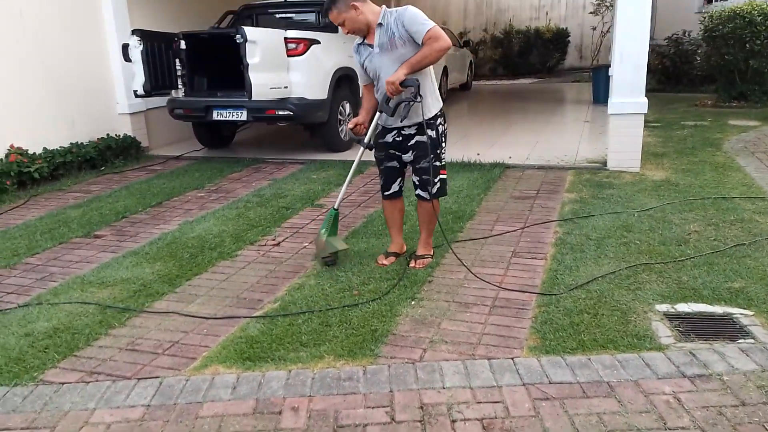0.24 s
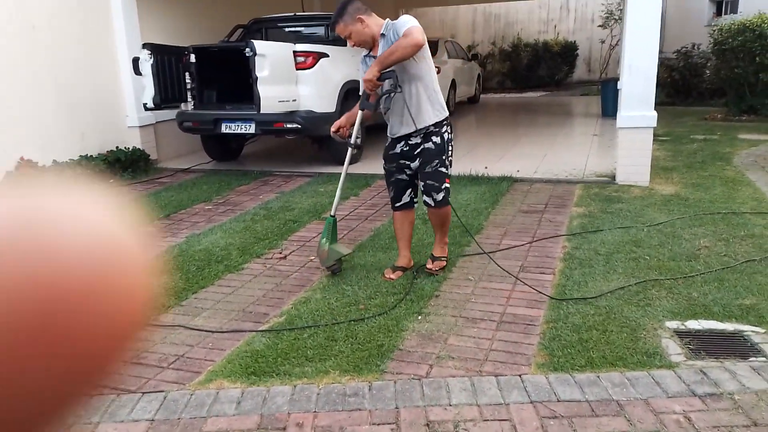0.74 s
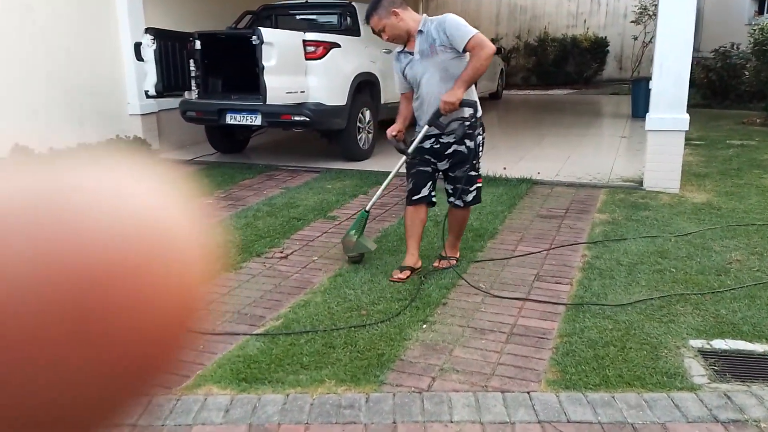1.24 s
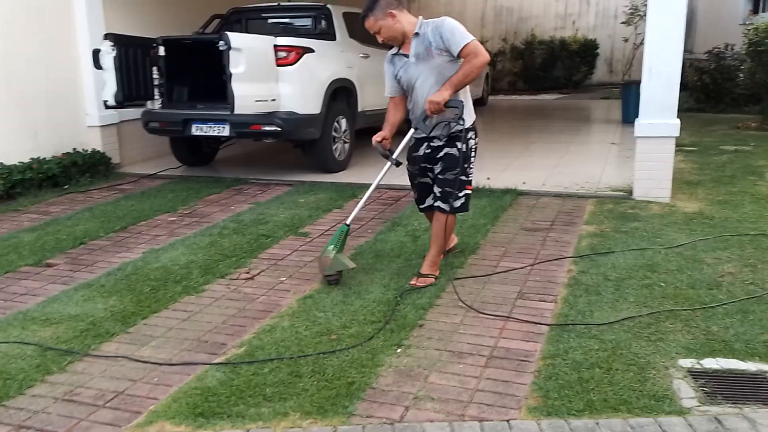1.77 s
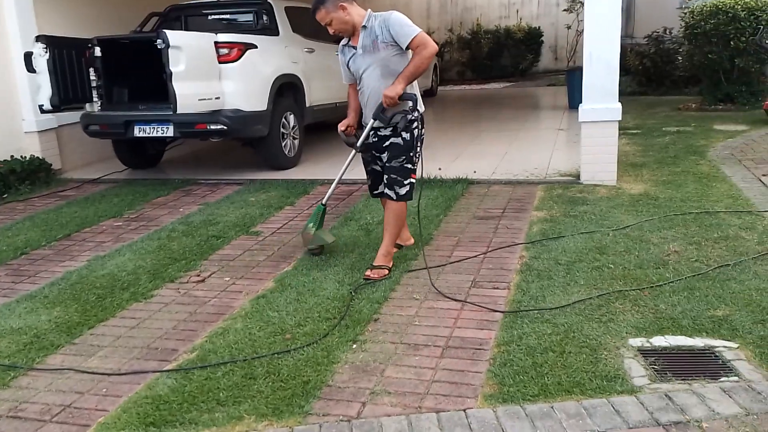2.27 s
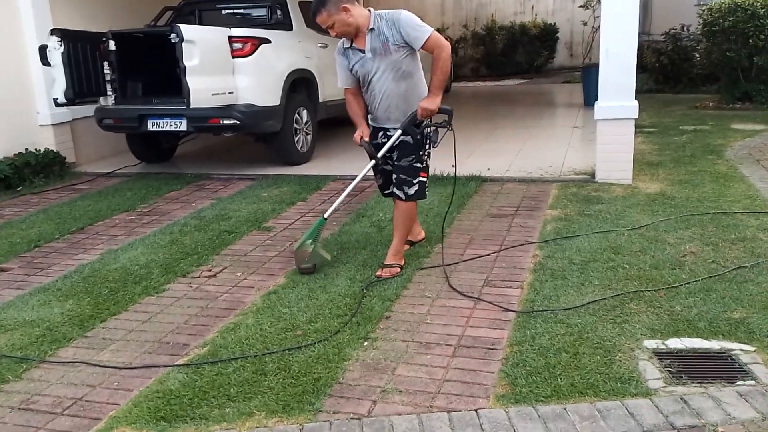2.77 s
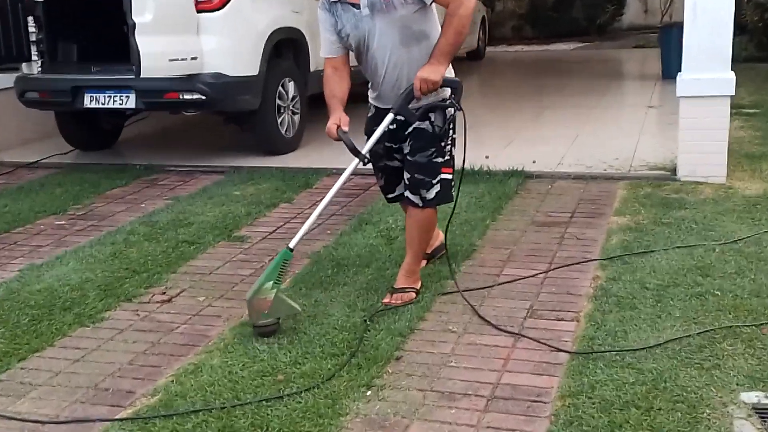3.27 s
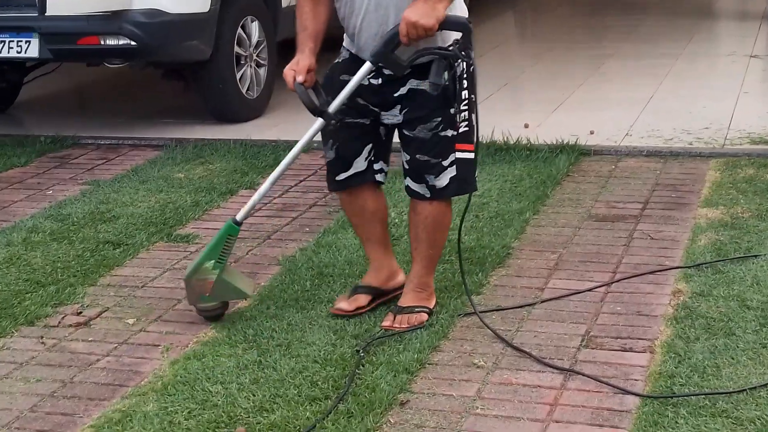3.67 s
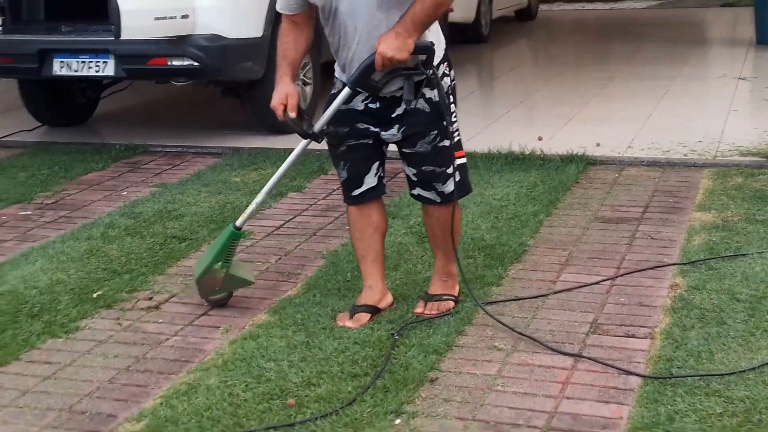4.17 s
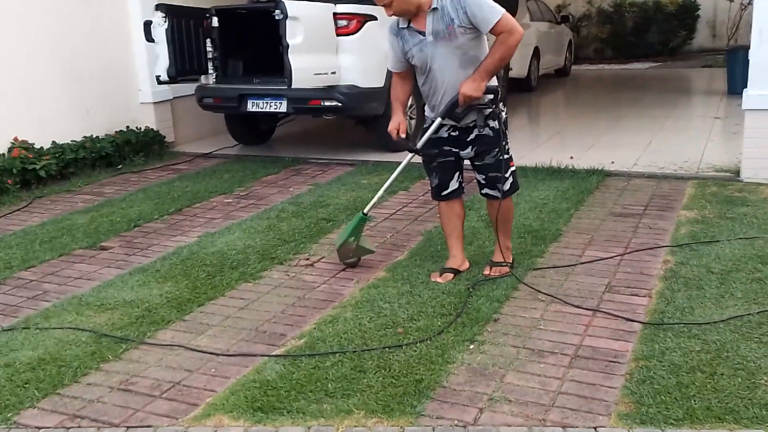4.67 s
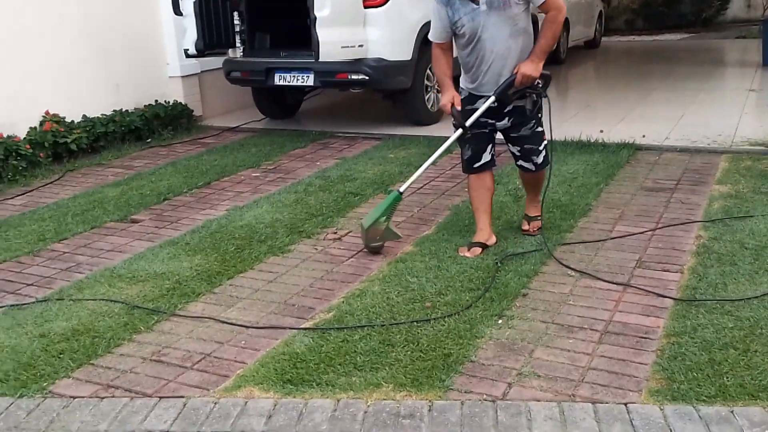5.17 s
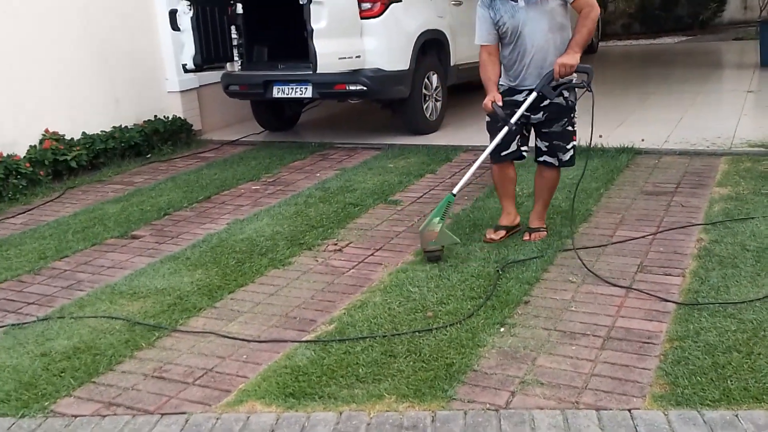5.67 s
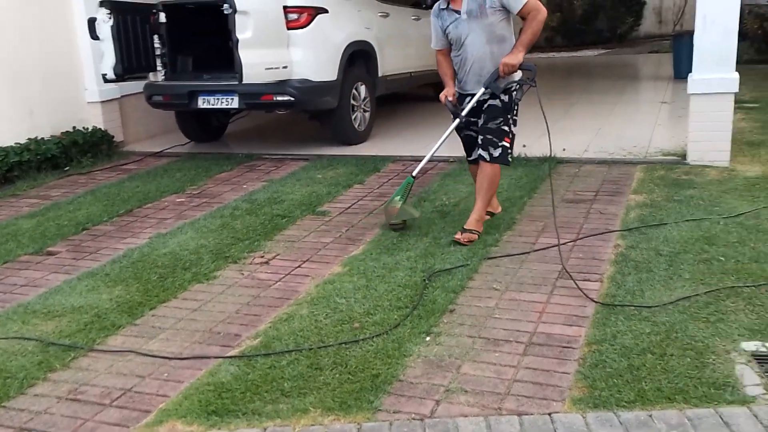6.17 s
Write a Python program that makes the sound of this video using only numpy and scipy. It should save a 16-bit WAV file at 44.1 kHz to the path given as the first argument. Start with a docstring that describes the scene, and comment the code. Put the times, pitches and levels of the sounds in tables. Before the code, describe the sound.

A corded electric string trimmer works close by on a driveway lawn strip. The trigger is pumped about twenty times in six seconds, so the buzzing hum and airy hiss rise and sag. Grass tears in raspy, fluttering bursts, with hard snaps clustered early, around two seconds and at the end. A handheld phone hears it in stereo, the left side first shaded by a hand, with short garage echo.

```python
"""A corded string trimmer works along a lawn strip in a driveway, heard through a hand-held phone.
The spinning nylon line hums as orders of the shaft speed, hisses and swishes as filtered noise, rasps in one
noise burst a turn through the grass, flaps in half orders, buffets its guard and snaps on stalks and pavers.
The trigger is pumped: the motor spins up and coasts down, faster in thick grass. A garage adds a short echo over
faint outdoor air. A hand shades the left microphone port and slides off; a finger briefly nears the right one."""
import sys
import numpy as np
from scipy import signal
from scipy.fft import rfft, irfft, next_fast_len
from scipy.io import wavfile
from scipy.ndimage import uniform_filter1d, minimum_filter1d

SR = 44100
rng = np.random.default_rng(int(sys.argv[2]) if len(sys.argv) > 2 else 0)


def wav_record(signal):
    """Record a signal, one row per channel, as 16-bit PCM in the file named by sys.argv[1]."""
    frames = np.transpose(np.atleast_2d(signal))
    bounded = np.clip(frames, -1, 1)
    # unit amplitude maps onto the largest positive 16-bit level
    quanta = np.round(bounded * 32767).astype(np.int16)
    wavfile.write(sys.argv[1], SR, quanta)


N = 282681
TIME = np.arange(N) / SR
USUAL_SPEED = 131.8  # turns per s; the reference for levels and pitches


def amp(db):
    """Decibels to gain."""
    return 10 ** (np.asarray(db) / 20)


def unit(x):
    """Scales to rms 1."""
    return x / np.sqrt(np.mean(x ** 2) + 1e-20)


def noise(channels=2):
    """White noise, independent in each channel."""
    return rng.standard_normal((channels, N))


def curve(rows):
    """A two-column table drawn as an automation line over time."""
    s, value = np.transpose(rows)
    return np.interp(TIME, s, value)


def read(points, hz):
    """Reads a spectrum at the given frequencies, on a logarithmic frequency scale."""
    f, value = np.transpose(points)
    return np.interp(np.log(hz + 1), np.log(f + 1), value)


def colour(x, points, size=4096):
    """Minimum-phase equaliser with the given spectrum."""
    log_gain = np.log(amp(read(points, abs(np.fft.fftfreq(size, 1 / SR)))))
    taps = np.fft.ifft(np.exp(np.conj(signal.hilbert(log_gain)))).real[:size // 2]
    return signal.oaconvolve(np.atleast_2d(x), taps[None], axes=1)[:, :N]


def wander(hz):
    """Slow random drift of rms 1, mostly below hz."""
    size = next_fast_len(N, True)
    lowpass = 1 / (1 + (np.fft.rfftfreq(size, 1 / SR) / hz) ** 4)
    return unit(irfft(rfft(rng.standard_normal(size)) * lowpass, size)[:N])


def sweep(turns, length):
    """Opens at the start of each turn and dies away over a share of it."""
    return np.exp(-(turns % 1) / length)


def passes(turns, depth_db, lag=0., sharp=4.9):
    """Gathers the sound into one burst a turn, at the same mean power."""
    gain = amp(depth_db * (.5 + .5 * np.cos(2 * np.pi * (turns - lag))) ** sharp)
    return gain / np.sqrt(uniform_filter1d(gain ** 2, size=1500))


def per_turn(turns, spread_db, size=2048):
    """A fresh random strength for every turn."""
    strengths = np.clip(rng.standard_normal(size), -2, 2)
    return amp(spread_db * strengths[turns.astype(int) % size])


def beats(turns):
    """One impulse a turn."""
    return np.diff(np.floor(turns), prepend=0)


# Pulls of the trigger: (pressed [s], released [s], speed reached [turns/s],
# then extra level of: second order [dB], third order [dB], hiss [dB], whir [dB])
TRIGGER_PULLS = [(0.0, 0.211, 119.3, -9, -6, 5.5, 16), (0.254, 0.379, 121.4, -2.5, -3, -9, 19.5),
                 (0.712, 1.03, 121, -2.5, -6, -0.5, 10.5), (1.201, 1.333, 114.4, -10, -7, -3.5, 6),
                 (1.5, 1.691, 122.5, -3, -6, 1, 11), (1.727, 1.977, 121, 0.5, -1, -4, 13.5),
                 (1.998, 2.062, 119, 4, 3, -13, 11), (2.122, 2.291, 116.6, -2.5, -1, 2.5, 8.5),
                 (2.434, 2.584, 132.5, 2.5, -1, 2.5, 5), (2.703, 2.859, 138, 2, 1, 3, 3),
                 (2.885, 2.998, 134.6, 0, 3, 2, 7.5), (3.202, 3.434, 138.3, 2.5, -7, 0.5, 3),
                 (3.599, 3.677, 129.7, -1, -6, 3.5, 10), (3.872, 4.025, 132, 3.5, -1, 4.5, 5),
                 (4.137, 4.277, 136, 3.5, -3, 5, 5.5), (4.426, 4.558, 133.3, 6.5, -1, 3.5, 8.5),
                 (4.732, 4.868, 135, 1, 0, 3.5, 10), (5.047, 5.171, 125.6, 3.5, -3, 4, 10),
                 (5.605, 5.919, 123.3, -4, -2, 1.5, 10), (5.995, 6.32, 134, -1.5, -7, -1.5, 1)]
# A tuft wraps the line and brakes the coasting shaft: (from [s], to [s], added slowing [turns/s per s])
SNAGS = [(0.384, 0.474, 123), (1.056, 1.195, 72), (5.25, 5.493, 15)]
START_SPEED, SPIN_UP_S = 72, .2  # turns per s; time constant of the motor
# slowing when coasting at the usual speed (turns/s per s): in air, and added in thick grass
AIR_DRAG, GRASS_DRAG = 132, 400
DRAG_POWER = 3.5  # the slowing grows with this power of the speed


def motor(tangle, size=2200):
    """Spins up while the trigger is held, then coasts against air, grass and snags; returns speed and torque 0-1."""
    speed, torque = np.full(N, float(START_SPEED)), np.zeros(N)
    drag = (AIR_DRAG + GRASS_DRAG * tangle) / USUAL_SPEED
    n = DRAG_POWER - 1
    brake = sum(slowing * (TIME > start) * (TIME < end) for start, end, slowing in SNAGS)
    for pressed, released, top, *_ in TRIGGER_PULLS:
        on, off = max(round(pressed * SR), 0), round(released * SR)
        rise = 1 - np.exp(-TIME[:off - on] / SPIN_UP_S)
        speed[on:off] = speed[on] + (top - speed[on]) * rise / rise[-1]
        torque[on:off] = 1 - rise
        # closed-form coasting under the power-law drag; the next pull overwrites the rest
        slowed = (USUAL_SPEED / top) ** n + n * np.cumsum(drag[off:]) / SR
        coasting = USUAL_SPEED * slowed ** (-1 / n)
        speed[off:] = np.maximum(coasting - np.cumsum(brake[off:]) / SR, USUAL_SPEED / 2)
    return uniform_filter1d(speed, size=size), uniform_filter1d(torque, size=size)


def aim(size=4000):
    """The head points differently on each pull: extra dB of second order, third order, hiss and whir."""
    pressed, _, _, *extras = np.transpose(TRIGGER_PULLS)
    pull = np.maximum(np.searchsorted(pressed, TIME) - 1, 0)
    return uniform_filter1d(np.array(extras)[:, pull], size=size, axis=1)


# The line strains against the grass and one order swells:
# (centre [s], half length [s], order [multiple of shaft speed], level [dB])
SWELLS = [(0.27, 0.061, 2.5, 9), (0.34, 0.05, 2, 12), (0.357, 0.024, 3, 11), (0.36, .025, 5, 18),
          (0.406, .03, 7, 14), (0.43, 0.022, 3, 7), (0.51, .03, 5, 17), (1.007, 0.032, 2.5, 8),
          (1.015, .045, 2, 16), (1.06, 0.029, 3, 18), (1.063, 0.025, 7, 19), (1.063, .03, 8, 24),
          (1.106, 0.031, 4, 26), (1.139, 0.035, 3, 21.5), (1.724, 0.048, 2.5, 18), (1.931, 0.065, 2, 9.5),
          (1.99, .05, 2.5, 6), (2.029, 0.046, 3, 5), (2.112, 0.049, 7, 13), (2.127, .05, 2, 14.5),
          (2.138, 0.056, 9, 16), (2.15, 0.064, 4, 12.5), (2.655, 0.048, 6, 11.5), (2.88, .04, 5, 15),
          (2.885, 0.038, 2, 11), (2.88, .03, 7, 17), (2.977, 0.031, 6, 0), (3.001, .04, 2, 15.5),
          (3.02, 0.038, 7, 8), (3.342, 0.049, 5, 13), (3.35, 0.051, 6, 4), (4.226, 0.036, 6, 1),
          (4.561, .05, 6, 4), (5.831, 0.049, 3, -3.5), (5.974, 0.043, 2, 9.5), (6.011, 0.032, 2.5, 14.5),
          (6.17, 0.06, 2.5, 13.5), (6.379, 0.042, 2.5, 16), (6.386, 0.028, 3, 9)]


def swell(order):
    """Extra dB of one order while the line strains, as bell-shaped rises."""
    extra_db = np.zeros(N)
    for s, half, swelling, db in SWELLS:
        if round(2 * swelling) == 2 * order:
            extra_db += db * np.exp(-.5 * ((TIME - s) / half) ** 2)
    return extra_db


# Higher orders of the hum: (frequency [Hz], level against the third order [dB])
HUM_SPECTRUM = [(330, 2), (440, -5.5), (500, -16), (620, -17.5), (800, -10.5), (1100, -16.5), (1600, -19)]
SHAFT_DB, SHAFT_WAVER_DB = -63.0, 3.3  # first order
HUM_SHUDDER, HUM_SHUDDER_HZ = .2, 22  # share by which each order shudders; rate in Hz per order
HUM_BLUR_TURNS = .085  # phase wobble of each order from the fifth up


def hum(turns, speed, second_db, third_db, follows=0.39, waver_db=2, wobble=0.0081, count=10):
    """The spinning line pushes air round: shuddering orders of the shaft speed, the high ones blurred."""
    angle = turns + wobble * wander(21)
    first_db = SHAFT_DB + follows * (second_db - np.median(second_db)) + SHAFT_WAVER_DB * wander(34)
    levels_db = [first_db, second_db, third_db]
    levels_db += [third_db + read(HUM_SPECTRUM, k * speed) + waver_db * wander(3.4) for k in range(4, count)]
    tone = 0
    for k, db in enumerate(levels_db, 1):
        blur = HUM_BLUR_TURNS * wander(35) if k >= 5 else 0
        shudder = 1 + HUM_SHUDDER * wander(HUM_SHUDDER_HZ * k) if k >= 2 else 1
        phase = k * angle + blur + rng.random()
        tone = tone + amp(db + swell(k)) * shudder * np.cos(2 * np.pi * phase)
    return np.sqrt(2) * tone


# Hiss of the line at the usual speed: (frequency [Hz], level [dB])
HISS_SPECTRUM = [(500, -21.5), (2000, -12.5), (3500, -22.5), (5000, -13), (6500, -2), (8000, 2.5),
                 (10500, 2), (13000, -3), (17000, -4), (24000, 0)]
# Fixed colour of the hiss, thinner below 1 kHz and round 1.5 kHz: (frequency [Hz], gain [dB])
HISS_LOW_COLOUR = [(900, -10), (1200, 1.5), (1500, -5), (2100, -1)]


def hiss(turns, speed, bite, level_db, depth_db=14.0, patch_db=2.04, size=512):
    """Vortices shed by the line: pitch scales with speed, and they flare where the tip meets the grass."""
    hz, t, z = signal.stft(noise(), SR, nperseg=size)
    pitch = np.interp(t, TIME, speed) / USUAL_SPEED
    patches = uniform_filter1d(rng.standard_normal(z.shape[1:]), size=12, axis=0)
    patches = unit(uniform_filter1d(patches, size=5, axis=1))
    z = z * amp(read(HISS_SPECTRUM, hz[:, None] / pitch) + patch_db * patches)
    flare = passes(turns, depth_db * bite * amp(wander(5.1)))
    flare = flare * per_turn(turns + .5, spread_db=1.0 * np.sqrt(bite))
    shed = amp(level_db) * unit(flare) * signal.istft(z, nperseg=size)[1][:, :N]
    return colour(shed, HISS_LOW_COLOUR)


# centre at the usual speed and its lower limit; the centre rises with this power of the speed
SWISH_HZ, SWISH_LOWEST_HZ, SWISH_POWER = 9400, 4870, 1.3


def swish(speed, level_db, below=0.38, above=0.095, size=512):
    """The tip whistles in the air: a breathy band, steeper above than below (octaves), gliding with speed."""
    hz, t, z = signal.stft(noise(), SR, nperseg=size)
    pitch = np.interp(t, TIME, speed) / USUAL_SPEED
    centre = np.maximum(SWISH_HZ * pitch ** SWISH_POWER, SWISH_LOWEST_HZ)
    octaves = np.log2((hz[:, None] + 1) / centre)
    band = np.exp(-.5 * (octaves / np.where(octaves < 0, below, above)) ** 2)
    return amp(level_db) * signal.istft(z * band, nperseg=size)[1][:, :N]


# Dips of the head into the grass: (in [s], out [s], fade-in [s], rasp [dB], one-sided bite [0-1],
# flapping of the line [dB], extra buffeting of the guard [dB])
GRASS_CUTS = [(0.16, 0.203, 0.0059, -34, 0.2, -49.5, -1.5), (0.21, 0.291, 0.0062, -27, 0.53, -44, 6),
              (0.308, 0.419, 0.02, -24, 0.4, -46, 0.5), (0.416, 0.51, 0.014, -29, 0.32, -50, 9),
              (0.507, 0.558, .012, -37.5, 0.59, -54, 8), (0.571, 0.622, .012, -42.5, 0.1, -60, -1),
              (0.732, 0.933, 0.017, -39.5, 0.46, -57, 4), (0.919, 1.096, 0.019, -27, 0.65, -41, 8),
              (1.098, 1.195, 0.02, -33, 0.53, -46, 18), (1.183, 1.266, .012, -39, 0.74, -52.5, 3),
              (1.593, 1.732, 0.0084, -26, 0.57, -48, 6), (1.769, 2.022, 0.0094, -25.5, 0.37, -41.5, 2),
              (2.019, 2.318, .012, -24.5, 0.52, -50.5, 2.5), (2.323, 2.411, .012, -32, 0.46, -52, 6),
              (2.822, 2.897, 0.022, -37, 0.86, -58, 5.5), (2.908, 3.062, 0.012, -32.5, 0.65, -58, 5),
              (3.3, 3.57, 0.014, -31, 0.42, -61.5, -1.5), (3.628, 3.782, 0.014, -33, 0.24, -63.5, -0.5),
              (3.838, 4.212, 0.017, -31, 0.57, -64, -2.5), (4.224, 4.323, 0.015, -27.5, 0.98, -63, 1.5),
              (4.338, 4.532, 0.011, -31, 1, -63.5, -4), (4.536, 4.619, 0.015, -24.5, 0.95, -57, -12),
              (4.663, 5.07, 0.032, -32, 0.99, -62, -4.5), (5.069, 5.221, 0.011, -28, 0.99, -56, 1.5),
              (5.712, 5.973, 0.021, -43, 0.3, -55, 0), (5.968, 6.148, 0.02, -28, 0.37, -46.5, 0.5),
              (6.155, 6.454, 0.016, -25.5, 0.3, -50.5, -1)]
LIFT_OUT_S = .016  # how softly a cut ends
FREE_BITE, FREE_FLAP_DB = 0.23, -71  # one-sidedness and flapping of the line in open air


def grass():
    """Fades each cut in and out; returns contact, rasp and flapping gains, bite and extra buffeting (dB)."""
    start, end, fade, rasp_db, one_sided, flap_db, guard_db = np.transpose(GRASS_CUTS)
    dip_in = (1 + np.tanh(.5 * (TIME[:, None] - start) / fade)) / 2
    lift_out = (1 + np.tanh(.5 * (end - TIME[:, None]) / LIFT_OUT_S)) / 2
    touch = dip_in * lift_out
    bite = np.clip(FREE_BITE + touch @ (one_sided - FREE_BITE), 0, 1)
    flapping = amp(FREE_FLAP_DB) + touch @ amp(flap_db)
    return touch.sum(1), touch @ amp(rasp_db), flapping, bite, touch @ guard_db


# Tearing grass: (frequency [Hz], level [dB])
RASP_SPECTRUM = [(40, -67), (150, -46.5), (250, -7), (600, -6), (1450, -4), (2000, -2.5), (3000, -1.5),
                 (5000, -4), (8000, 0.5), (11000, 3.5), (15000, -1)]
SLAP_SHARE = .42


def rasp(turns, bite, level_db, blades_per_s=4000, size_db=0.0, depth_db=15, fray=1.0):
    """Blades of grass tear in a burst once a turn; for a few turns at a time the tip slaps the ground."""
    sizes = amp(size_db * np.sqrt(bite) * np.minimum(rng.exponential(1, N), 4))
    blades = (rng.random(N) < blades_per_s / SR) * sizes * rng.choice([-1, 1], N)
    burst = passes(turns, depth_db * bite, lag=0.21) * per_turn(turns + .5, spread_db=2 * np.sqrt(bite))
    tearing = unit((unit(blades) + fray * noise()) * burst)
    slap_runs = amp(4.6 * np.clip(wander(5.6), -2, 1.5))
    slaps = unit(beats(turns) * np.sqrt(bite) * per_turn(turns, spread_db=1) * slap_runs)
    return amp(level_db) * colour(unit(tearing + SLAP_SHARE * slaps), RASP_SPECTRUM)


# Flapping line: (frequency [Hz], level [dB])
FLAP_SPECTRUM = [(30, -56), (100, -32), (180, -39), (230, -6.5), (300, -2), (380, -1.5), (480, -26),
                 (620, -15), (1000, -27), (2500, -33)]


def flap(turns, level_db, rough_db=-3.0, upper_db=1.0):
    """The line whips on every second turn, strongest in grass: half orders over a rough flutter."""
    halves = 0
    for k in range(2, 5):
        gain = amp(upper_db * (k - 4.5) + swell(k + .5))
        halves = halves + gain * np.cos(2 * np.pi * ((k + .5) * turns + rng.random()))
    flutter = unit(colour(noise(1) * sweep(turns, length=0.91), FLAP_SPECTRUM))
    return amp(level_db) * (colour(halves, FLAP_SPECTRUM) + amp(rough_db) * flutter)


# Resonances of the plastic guard: (frequency [Hz], level [dB])
GUARD_SPECTRUM = [(30, -64), (150, -37.5), (300, 2.5), (450, 3), (580, -5.5), (720, 3.5), (830, 6.5),
                  (1000, 1), (1250, -14), (1500, -9.5), (2000, -5.5), (3500, -13), (9000, -19)]


def buffet(turns, level_db, thump=0.58, apart=0.44, wobble=0.023):
    """Each pass of the line sends a thump and a puff of air into the plastic guard."""
    angle = np.maximum.accumulate(turns + wobble * wander(60))
    puffs = unit((noise(1) + apart * noise()) * sweep(angle, length=1.0))
    thumps = unit(beats(angle) * per_turn(angle, spread_db=4.5))
    return amp(level_db) * unit(colour(puffs + thump * thumps, GUARD_SPECTRUM))


# The line strikes a stalk or a paver: (time [s], relative level [dB], brightness [dB of treble])
SNAPS = [(0.2407, -10, 7), (0.256, -5.5, -3), (0.26, -6.5, -9), (0.2705, -13, -7), (0.291, -13, -2),
         (0.3065, -11, 2), (0.314, -5.5, -23), (0.325, -11, 3), (0.368, -3, -10), (0.3851, -6, 3),
         (0.959, -8, 1), (1.007, -11, -13), (1.033, -11, -11), (1.042, -14, -6), (1.0498, -9, -11),
         (1.058, -10, -13), (1.4271, -19, -13), (1.602, -27, 14), (1.619, -20, 4), (1.705, -19, -3),
         (1.7121, -1.5, -6), (1.725, -15, 1), (1.7286, -2.5, -5), (1.7636, -9, -5), (1.7934, -15, 5),
         (1.86, -6, -5), (1.865, -12, -2), (1.886, -7, 0), (1.943, -9, 0), (1.96, -13, 0), (1.964, -9, -2),
         (1.976, -4.5, -6), (1.9814, -1, -10), (1.993, -16, 4), (2.0707, -15, -2), (2.1117, -17, 9),
         (2.1305, -12.5, 1), (2.1755, -12, 6), (2.278, -16, 7), (2.293, -15, 10), (2.3635, -19, 2),
         (2.6634, -23.5, 12), (2.7148, -29, 12), (2.8647, -4, -40), (2.872, -7, -33), (2.9179, -24, 11),
         (2.962, -6.5, -29), (3.899, -15.5, 2), (4.0745, -15.5, 6), (4.264, -9.5, -27), (4.453, -29, 12),
         (4.4855, -12, 2), (4.5625, -8, -17), (4.577, -11, -20), (4.689, -16, 5), (4.7598, -30, 16),
         (4.862, -18, 8), (4.9295, -9, -8), (4.979, -18, 2), (5.0376, -17, -2), (5.0961, -14, 4),
         (5.158, -0.5, -14.5), (6.1081, -13, -4), (6.117, -9, -10), (6.14, -18, 5), (6.155, -13, -9),
         (6.171, -15, 3), (6.1849, -13, -5), (6.2154, -3, -6), (6.2529, -4, 3), (6.364, -23, 9.5),
         (6.374, -4, -15)]
# Body of a crack: (frequency [Hz], level [dB])
CRACK_SPECTRUM = [(40, -67), (150, -35), (300, 4.5), (1000, -3), (3000, 3), (14000, 12)]


def snaps(level_db=-6.5, decay=0.001, lead=.0004, split_hz=6500, size=512):
    """Sharp cracks of the line on something hard: decaying noise ticks, each with its own treble."""
    out, t = np.zeros((2, N + size)), np.arange(size) / SR
    high = 1 / (1 + (split_hz / (np.fft.rfftfreq(size, 1 / SR) + 1)) ** 4)
    before = size // 8  # room for the ringing ahead of the strike
    for s, db, bright_db in SNAPS:
        crack = rng.choice([-1, 1], (2, size)) * np.exp(-t / decay)
        crack = irfft(rfft(np.roll(crack, before, 1)) * amp(bright_db * high))
        start = max(round((s - lead) * SR) - before, 0)
        out[:, start:start + size] += amp(db + level_db) * crack
    return colour(out[:, :N], CRACK_SPECTRUM)


# Fan and brushes of the motor: (frequency [Hz], level [dB])
WHIR_SPECTRUM = [(100, -36), (600, -15.5), (1150, -44), (1500, -46), (1950, -13), (2700, 2.5), (3500, -2),
                 (6000, -1.5), (8000, -19), (14000, -13)]


def whir(level_db):
    """Smooth rush of the motor's fan and brushes, as coloured noise."""
    return amp(level_db) * colour(noise(), WHIR_SPECTRUM)


# How long the garage rings: (frequency [Hz], time to fall 60 dB [s])
ECHO_DECAY = [(200, 0.84), (1000, 0.7), (4000, 0.13), (14000, 0.26)]


def garage(x, wet_db=-10, delay=0.013, size=16, count=4):
    """Scattered echoes from walls and cars; their pattern shifts as the trimmer moves."""
    out = x
    half_second = SR // 2
    for k in range(count):
        scattered = rng.random((2, half_second)) < 1 / size
        taps = rng.standard_normal((2, half_second)) * scattered * (TIME[:half_second] > delay)
        hz, t, z = signal.stft(taps, SR, nperseg=256)
        tail = signal.istft(z * amp(-60 * t / read(ECHO_DECAY, hz)[:, None]), nperseg=256)[1]
        tail = tail / np.linalg.norm(tail[0])
        share = np.sqrt(2 / count) * np.cos(np.pi * (TIME * (k + 1) + rng.random()))
        out = out + amp(wet_db) * signal.oaconvolve(x * share, tail, axes=1)[:, :N]
    return out


# Outdoor background: (frequency [Hz], level [dB])
AIR_SPECTRUM = [(25, -62), (70, -57), (150, -59), (400, -33), (850, -81), (1500, -58), (2500, -53),
                (10000, -89)]


def outdoor_air():
    """Steady outdoor bed: coloured noise, partly shared between the two sides."""
    return colour(noise(1) + 0.62 * noise(), AIR_SPECTRUM)


# How each sound grows, by name: (level at the usual speed [dB], growth [dB per doubling of speed],
# then added: on touching grass [dB], in thick grass [dB], at full torque [dB])
GROWTH = {"second": (-48, 35, 2.5, 0, 1), "third": (-43.5, 29, 1.5, 4, 0),
          "guard": (-43, 21.5, 1.5, 0.5, 3), "hiss": (-26.5, 26.5, -0.4, 2, -0.5),
          "whir": (-42.5, 22.5, -4.5, 8, 0), "swish": (-36, 10.5, 1.5, 2.5, 4.5)}
RASP_DB_PER_DOUBLING, FLAP_DB_PER_DOUBLING = -5.5, -7.5
HUM_WAVER_DB, HUM_WAVER_HZ = 2.5, 9.2
# rasp at which the grass counts as thick; flapping at which it holds the line back
THICK_DB, TANGLED_DB = -31.5, -45


def scene():
    """One shaft drives every sound of the trimmer: its speed and the grass set pitches and levels."""
    contact, rasping, flapping, bite, buffet_db = grass()
    load = np.tanh(rasping / amp(THICK_DB))
    speed, torque = motor(np.tanh((flapping / amp(TANGLED_DB)) ** 2))
    doublings = np.log2(speed / USUAL_SPEED)
    db = {name: base + slope * doublings + touching * contact + thick * load + pulling * torque
          for name, (base, slope, touching, thick, pulling) in GROWTH.items()}
    second_db, third_db, hiss_db, whir_db = aim()
    second_db = second_db + db["second"] + HUM_WAVER_DB * wander(HUM_WAVER_HZ)
    third_db = third_db + db["third"] + HUM_WAVER_DB * wander(HUM_WAVER_HZ)
    turns = np.cumsum(speed * (1 + .002 * wander(30))) / SR

    low = hum(turns, speed, second_db, third_db)
    low = low + flapping * flap(turns, FLAP_DB_PER_DOUBLING * doublings)
    low = low + buffet(turns, db["guard"] + buffet_db)
    high = hiss(turns, speed, bite, db["hiss"] + hiss_db) + swish(speed, db["swish"])
    high = high + rasping * rasp(turns, bite, RASP_DB_PER_DOUBLING * doublings)
    high = high + snaps() + whir(db["whir"] + whir_db)
    return low + garage(high) + outdoor_air()


def suppressor(x, floor_db=-85, slope=0.7, depth_db=10, from_hz=1100, size=512):
    """Noise reduction: above the bass, bands under a floor are turned down further, hollowing the lulls."""
    hz, t, z = signal.stft(x, SR, nperseg=size, scaling="psd")
    power = uniform_filter1d(uniform_filter1d(2 * abs(z) ** 2, size=5, axis=1), size=7, axis=2)
    under_db = floor_db - 10 * np.log10(abs(power) + 1e-20)
    cut_db = np.clip(slope * under_db, 0, depth_db) * (hz > from_hz)[:, None]
    return signal.istft(z * amp(-cut_db), SR, nperseg=size, scaling="psd")[1][:, :N]


def limiter(x, size=45):
    """Turns the gain down for a moment round the highest peaks."""
    gain = np.minimum(1, .85 / (abs(x) + 1e-9))
    return x * uniform_filter1d(minimum_filter1d(gain, size, axis=1), size, axis=1)


# Hand at the left port: (time [s], distance [0 close over it, .5 loosely cupped, 1 away])
HAND = [(0, 0.062), (2.3, 0.017), (3.3, 0.22), (4.2, 0.52), (5.1, 0.55), (5.24, 0.78), (5.6, 0.85),
        (6.0, 0.99), (6.41, 0.98)]
# Finger at the right port: (time [s], nearness [0-1])
FINGER = [(0.72, 0.02), (0.78, 0.98), (1.44, 0.58), (1.5, 0)]
# Colour of each microphone port, by how it is covered: (frequency [Hz], gain [dB])
LEFT_SHADED = [(300, -3.5), (1000, -0.5), (1500, 1), (2000, 5.5), (2350, 6.5), (2800, 14), (3400, 11.5),
               (4300, 6.5), (6000, 1), (7300, -11), (9300, -5.5), (11000, -8), (14000, -17.5)]
LEFT_CUPPED = [(300, -2.5), (1000, -0.5), (1500, 3), (2000, 9), (2350, 9), (2800, 15.5), (3600, 16.5),
               (4800, 13), (6000, 5.5), (7300, -12.5), (9300, -8.5), (11000, -9.5), (14000, -22)]
LEFT_OPEN = [(300, -2.5), (1000, 1.5), (1500, 3.5), (2300, 8), (2800, 16), (3500, 17), (4800, 12.5),
             (5900, 13.5), (7200, 6.5), (9300, 2), (11000, 4.5), (14000, -1.5)]
RIGHT_OPEN = [(300, -3), (1500, -1.5), (2300, -4.5), (3300, -3.5), (5000, 1.5), (7000, -0.5), (8500, 3.5),
              (9500, 8.5), (10400, 12.5), (11200, 9), (12200, 5), (14000, -3.5)]
RIGHT_FINGERED = [(300, -2.5), (1500, -3.5), (2300, -3.5), (3300, -3), (5000, 2.5), (7000, 1.5),
                  (8500, 5.5), (9700, 12), (10500, 5), (12000, 3.5), (14000, 1.5)]
EDGE_HZ = 14500  # upper band limit


def record(dry, late_samples=6):
    """Two ports whose resonances shift with the hand, the left heard later; noise reduction, limiter, band limit."""
    hand = curve(HAND)
    finger = np.clip(curve(FINGER), 0, 1)
    late = np.pad(dry[0], (late_samples, 0))[:N]
    # crossfade between the three hand positions
    states = zip(np.eye(3), (LEFT_SHADED, LEFT_CUPPED, LEFT_OPEN))
    left = sum(np.interp(hand, [0, .5, 1], share) * colour(late, port) for share, port in states)
    right = (1 - finger) * colour(dry[1], RIGHT_OPEN) + finger * colour(dry[1], RIGHT_FINGERED)
    ports = limiter(suppressor(np.vstack([left, right])))
    band_limit = signal.firwin(301, EDGE_HZ, window=("kaiser", 9), fs=SR)
    return signal.oaconvolve(ports, band_limit[None], "same")


dry = scene()
out = record(dry)
wav_record(out)
```